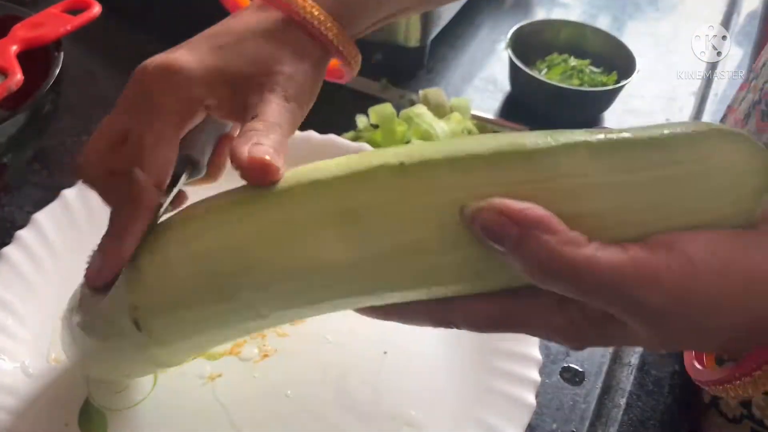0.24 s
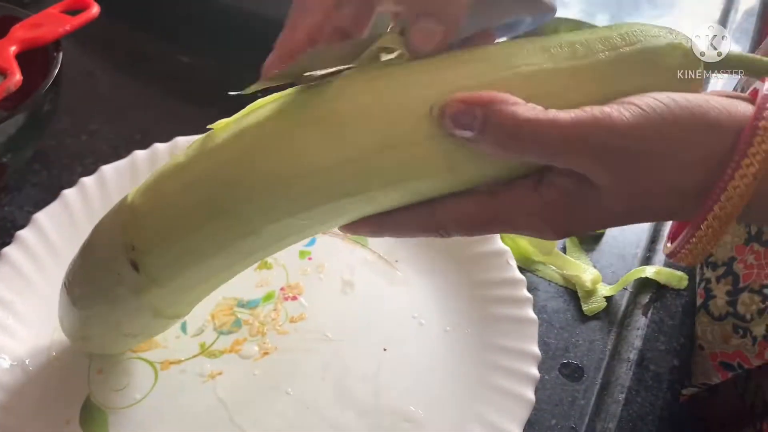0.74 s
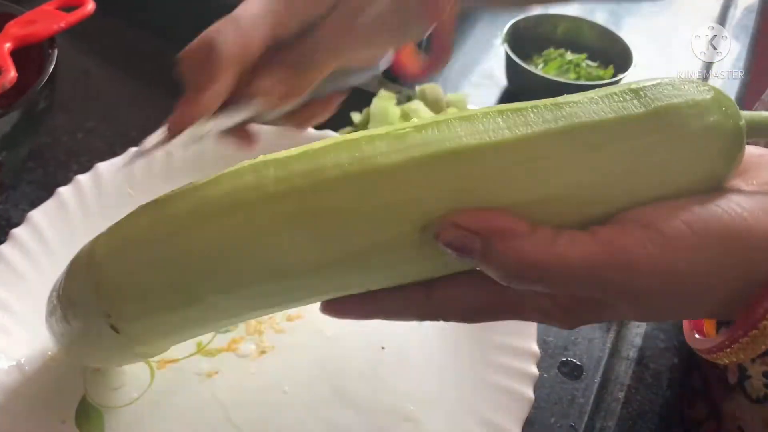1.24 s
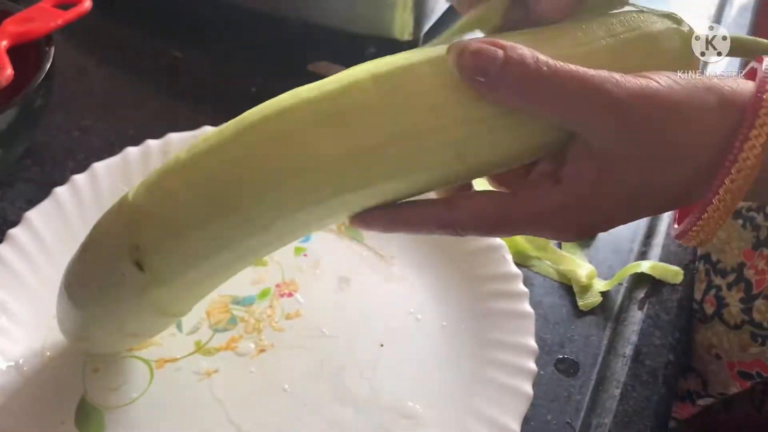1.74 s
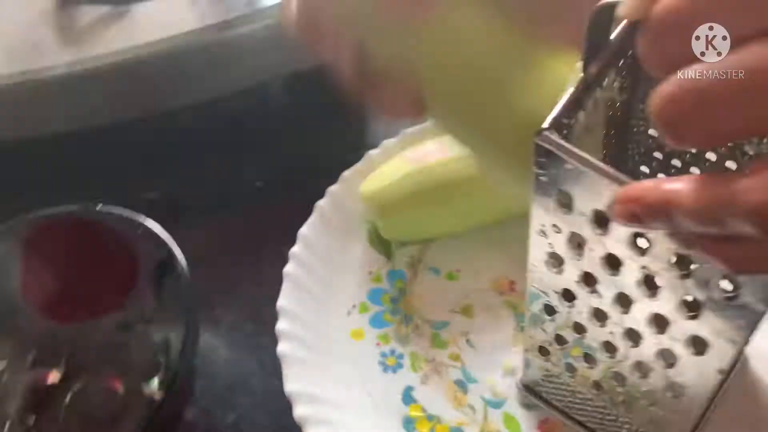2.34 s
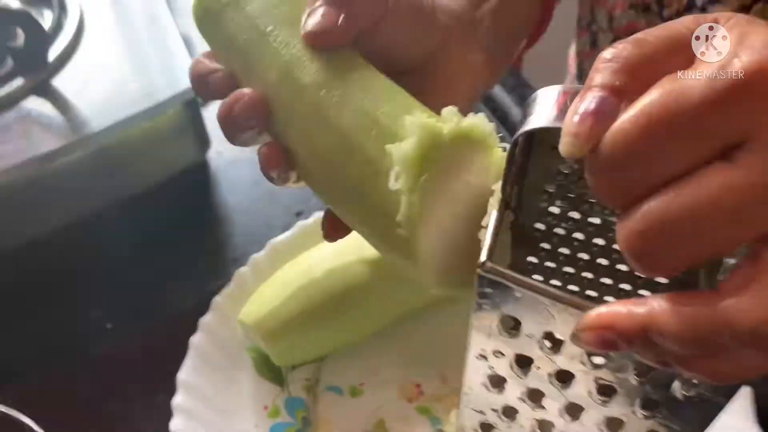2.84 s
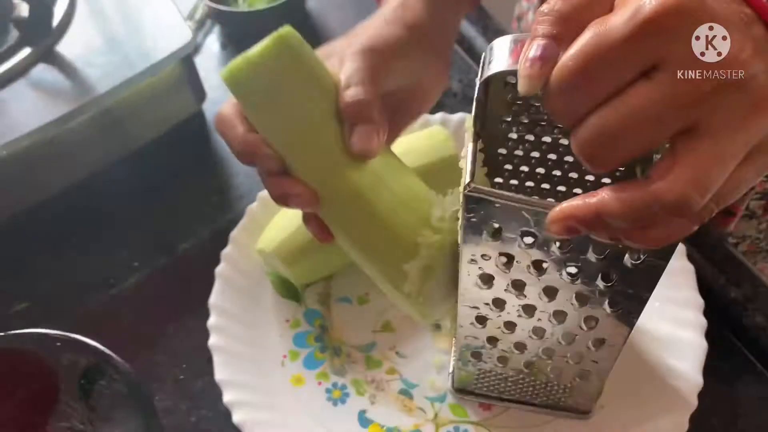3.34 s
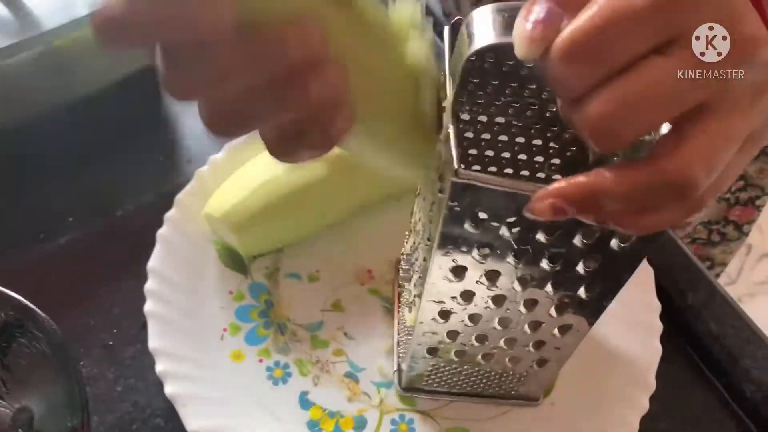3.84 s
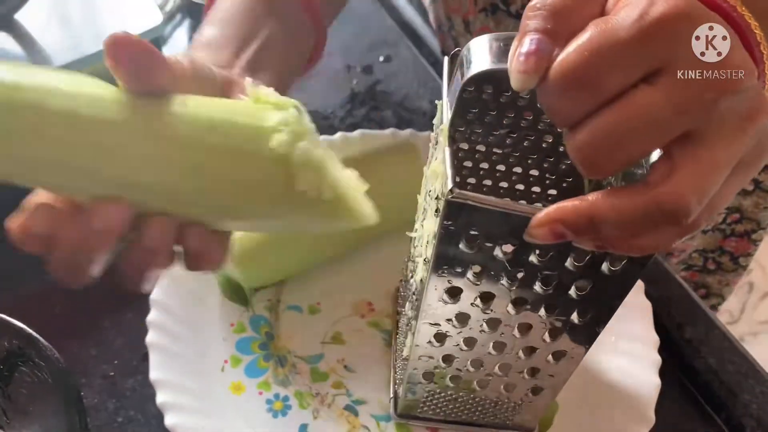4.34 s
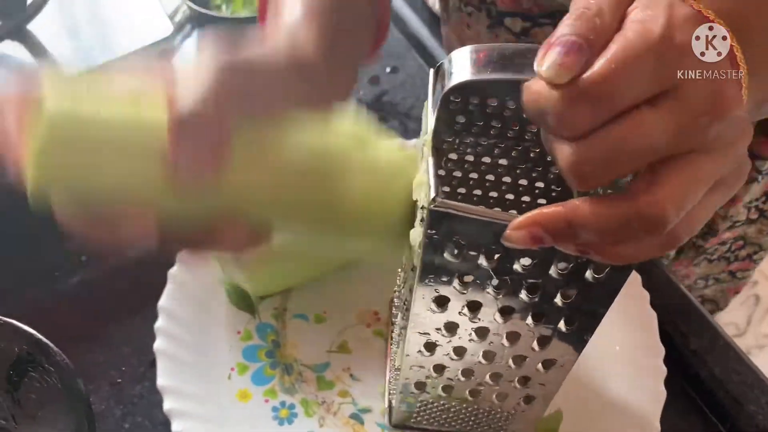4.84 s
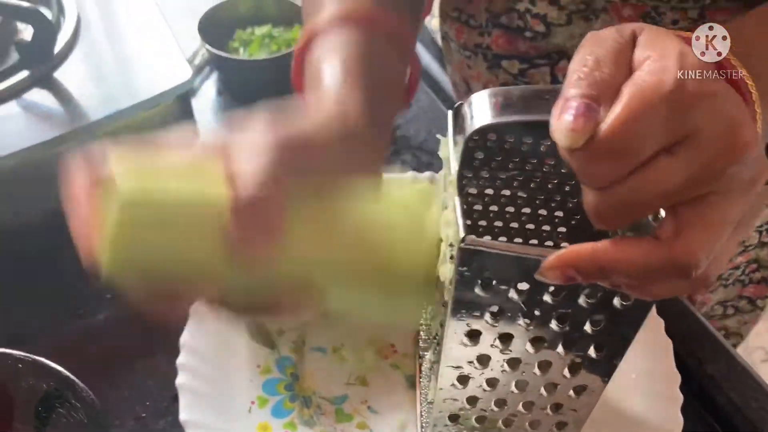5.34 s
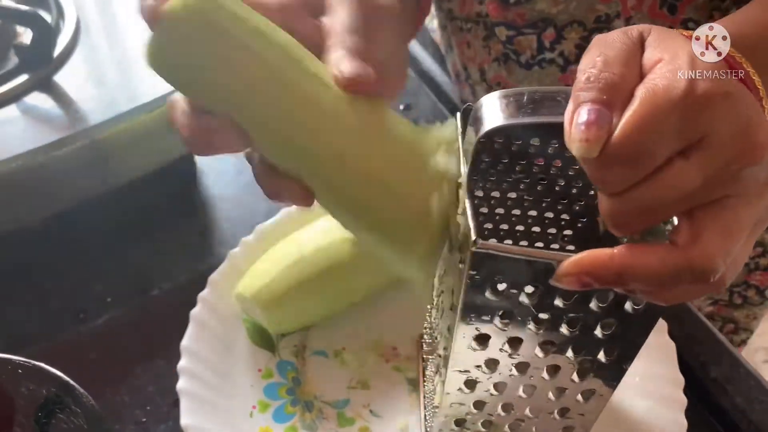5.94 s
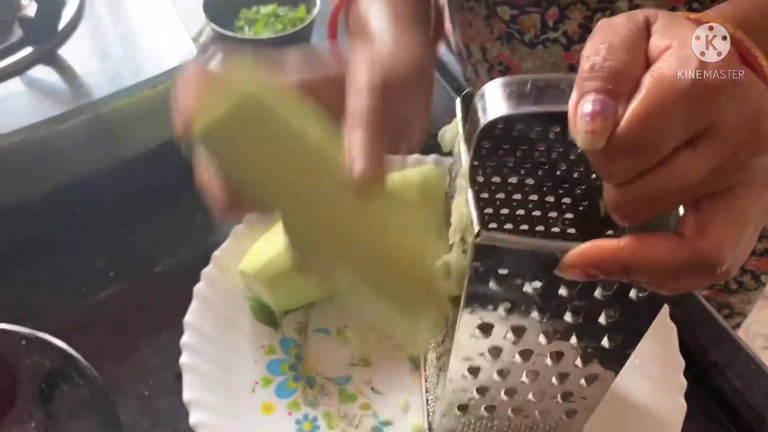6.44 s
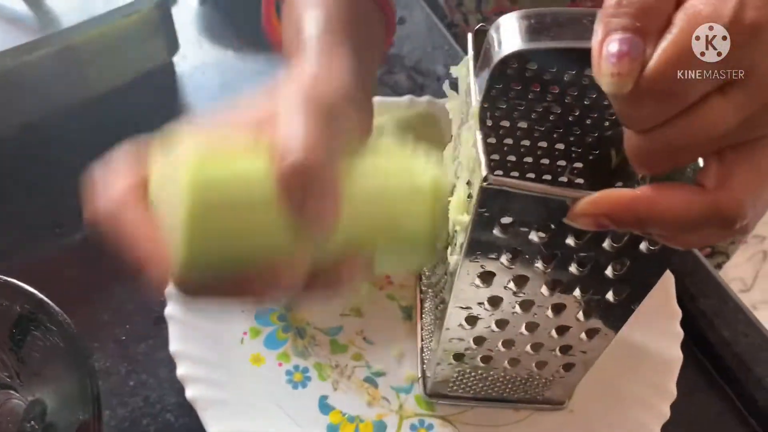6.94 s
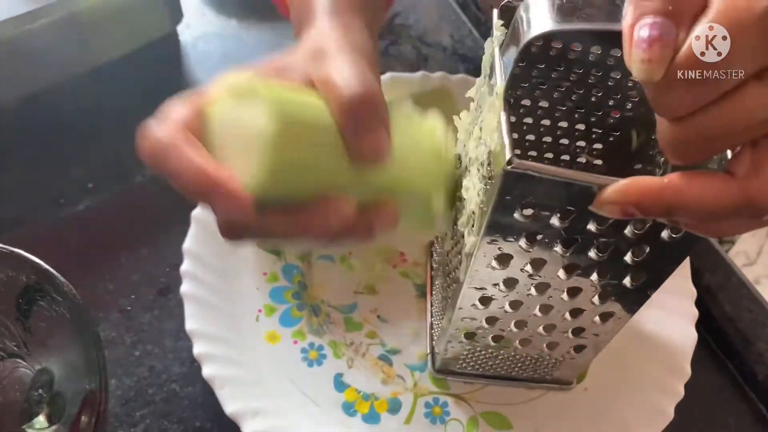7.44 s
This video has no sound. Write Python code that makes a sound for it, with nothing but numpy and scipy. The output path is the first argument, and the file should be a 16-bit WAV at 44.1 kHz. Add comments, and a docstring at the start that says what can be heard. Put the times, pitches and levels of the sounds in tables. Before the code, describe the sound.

In a small kitchen with a faint motor hum, a peeler snaps and tears through a hollow-sounding gourd in short pulls, with thin distant chirps between. Then a steel box grater rasps in five quick, even runs, wet and crunchy; its foot judders and groans twice on a plate with hard clunks. The grating stops and a vessel knocks on the counter. Close stereo microphone.

```python
"""A motor hums in dull room noise (sines, coloured noise); a bottle gourd is peeled (grains, hollow body).
Faint chirps (gliding sines) follow. Then five fast, even runs on a steel box grater: each stroke sends
grains through flesh, face and box spectra. Twice the foot judders and groans on a plate (stick-slip
pulses, a sine), with clunks; the box knocks and hiss comes and goes. All this dips near 1.9 s and from
7.5 s to the end, where a vessel is knocked on the counter (noise, decaying modes)."""
import sys
import numpy as np
from scipy import signal
from scipy.fft import rfft, irfft, next_fast_len
from scipy.io import wavfile
from scipy.ndimage import uniform_filter1d

SR = 44100
rng = np.random.default_rng(int(sys.argv[2]) if len(sys.argv) > 2 else 0)


def store_pcm(level_fs):
    """Save levels as 16-bit WAV."""
    pcm = np.round(np.clip(level_fs, -1, 1) * 32767).astype(np.int16)
    wavfile.write(sys.argv[1], SR, np.atleast_2d(pcm).T)


N = 339570
TIME = np.arange(N) / SR


def from_db(db):
    """Amplitude ratio of a level in dB."""
    return 10 ** (np.asarray(db) / 20)


def rms_one(x):
    """Scale to rms 1."""
    return x / np.sqrt(np.mean(x ** 2) + 1e-20)


def unit_energy(response):
    """Scale an impulse response so that it keeps the power of white noise."""
    return rms_one(response) / np.sqrt(response.shape[-1])


def at_hz(points, hz):
    """Read a spectrum on a log-frequency axis."""
    known_hz, value = np.transpose(points)
    return np.interp(np.log(hz + 1), np.log(known_hz), value)


def drift(rate_hz):
    """Slow random curve of rms 1, with rate_hz random knots per second."""
    knots = np.arange(0, TIME[-1] + 1, 1 / rate_hz)
    return rms_one(np.interp(TIME, knots, rng.standard_normal(len(knots))))


def clicks(rows):
    """One impulse for each (t/s, level/dB)."""
    out = np.zeros(N)
    for s, db in rows:
        out[int(s * SR)] += from_db(db)
    return out


def held(start, end, rise_db_per_s, fall_db_per_s):
    """Gain that rises to one at the start, holds, and dies away after the end."""
    rise_db = -rise_db_per_s * np.maximum(start - TIME, 0)
    fall_db = -fall_db_per_s * np.maximum(TIME - end, 0)
    return from_db(rise_db + fall_db) + 1e-12


def held_spans(spans, rise_db_per_s, fall_db_per_s):
    """Summed held gains of (start/s, end/s, level/dB)."""
    return sum(from_db(db) * held(start, end, rise_db_per_s, fall_db_per_s) for start, end, db in spans)


def through(x, response):
    """Send a sound through an impulse response."""
    return signal.fftconvolve(np.atleast_2d(x), np.atleast_2d(response), axes=1)[:, :N]


def colour(spectrum, size=4096):
    """Causal (minimum-phase) response with the given spectrum, falling away beyond its ends."""
    hz = np.arange(size // 2 + 1) * SR / size + 1
    low_end = 1 / (1 + (spectrum[0][0] / hz) ** 4)
    high_end = 1 / (1 + (hz / spectrum[-1][0] / 2) ** 4)
    cepstrum = irfft(np.log(from_db(at_hz(spectrum, hz)) * low_end * high_end + 1e-5))
    # fold the cepstrum forward: minimum phase
    cepstrum[1:size // 2] *= 2
    cepstrum[size // 2 + 1:] = 0
    return unit_energy(irfft(np.exp(rfft(cepstrum))))


def resonances(modes, size=8192):
    """Response of parallel (f/Hz, width/Hz, level/dB) resonances with alternating sign."""
    t = TIME[:size]
    response = 0
    for k, (hz, width_hz, db) in enumerate(modes):
        decay = width_hz * np.exp(-np.pi * width_hz * t)
        response = response + (-1) ** k * from_db(db) * decay * np.cos(2 * np.pi * hz * t)
    return unit_energy(response)


# Likeness of the two microphones: f/Hz, correlation
MIC_LIKENESS = [(100, 0.076), (400, 0.89), (700, 0.84), (1400, 0.73), (2600, -0.35), (5000, -0.15),
                (15000, -0.16)]


def two_ports(pair):
    """Mix two unrelated signals onto two microphones: alike in low mids, slightly opposed in treble."""
    size = next_fast_len(pair.shape[1])
    mid, side = rfft(pair, size)
    alike = np.clip(at_hz(MIC_LIKENESS, np.arange(len(mid)) * SR / size), -.97, .97)
    spectra = np.sqrt(1 + alike) * mid + np.sqrt(1 - alike) * side * [[1], [-1]]
    return irfft(spectra, size)[:, :pair.shape[1]]


def stereo_noise(size):
    """White noise on the two microphones."""
    return two_ports(rng.standard_normal((2, size)))


def grains(per_s, spread_db):
    """Single-sample grains at random moments and places, a few much louder; stereo."""
    sizes = from_db(spread_db * np.minimum(rng.exponential(1, N), 4))
    sizes = sizes * (rng.random(N) < per_s / SR)
    place = rng.uniform(0, 2 * np.pi, N)
    return two_ports(rms_one(sizes * np.array([np.cos(place), np.sin(place)])))


def space(near_db, room_db, near_t60=0.049, room_t60=0.25, size=16384):
    """Direct sound, quick reflections from steel and counter, and the kitchen's tail; t60 in s."""
    t = TIME[:size]
    near = unit_energy(stereo_noise(size) * from_db(-60 * t / near_t60))
    tail = unit_energy(stereo_noise(size) * from_db(-60 * t / room_t60) * (t > .006))
    return unit_energy((t == 0) + from_db(near_db) * near + from_db(room_db) * tail)


def off_centre(x, lag_s=.00016):
    """One sound on both microphones, a little later on the right."""
    return np.array([x, np.interp(TIME - lag_s, TIME, x)])


def running_level(x, size):
    """Short-term rms of a stereo sound over size samples."""
    return np.sqrt(np.abs(uniform_filter1d(np.mean(x ** 2, axis=0), size=size)) + 1e-9)


# Room noise spectrum: f/Hz, level/dB
AIR_SPECTRUM = [(50, -28.5), (95, -18.5), (140, -4.5), (200, -1), (270, -6), (440, 0), (640, -9.5),
                (840, -5), (930, -10.5), (1100, -8), (1200, -5.5), (1400, -9.5), (2100, -11), (2800, -15.5),
                (7000, -23.5), (15000, -35)]
# Motor harmonics: f/Hz, level/dB
MOTOR_HUM = [(199.9, -64.5), (299.9, -79.5), (399.8, -74), (499.7, -76)]
PEELING_AIR_DB, GRATING_AIR_DB = -63, -61  # before and after the first dip starts


def background():
    """Dull room noise of coloured noise, and a motor's hum of sines with drifting phase."""
    air = through(stereo_noise(N), colour(AIR_SPECTRUM)) * from_db(0.94 * drift(11))
    hum = 0
    for hz, db in MOTOR_HUM:
        hum = hum + np.sqrt(2) * from_db(db) * np.sin(2 * np.pi * hz * TIME + 0.2 * drift(7.9))
    air_db = np.where(TIME < DIP_SPANS[0][0], PEELING_AIR_DB, GRATING_AIR_DB)
    return air * from_db(air_db) + hum


# Hands shifting on the gourd: start/s, end/s, level/dB
HAND_SHIFTS = [(0.03, 0.054, -64), (0.158, 0.29, -65), (0.506, 0.554, -60.5), (0.795, 0.865, -65.5)]
# Resonances of the handled gourd: f/Hz, width/Hz, level/dB
HAND_MODES = [(450, 58, -4), (837, 47, 3.5), (1024, 65, -0.5), (1224, 70, -3)]
SHIFT_FADE_DB_PER_S = 200


def handling():
    """Soft, hollow rubbing as the hands move: sparse grains through a few resonances."""
    level = held_spans(HAND_SHIFTS, SHIFT_FADE_DB_PER_S, SHIFT_FADE_DB_PER_S)
    return through(grains(per_s=900, spread_db=3.0) * level, resonances(HAND_MODES))


PEEL_RISE_DB_PER_S, PEEL_FALL_DB_PER_S = 1000, 296
# Strip ringing higher as the blade runs along: start/s, end/s, first f/Hz, last f/Hz, level/dB
STRIP_GLIDES = [(0.368, 0.425, 715, 1400, -52.5), (1.486, 1.524, 1100, 1470, -52.5)]
STRIP_WIDTH_HZ = 170


def strips(cells):
    """Tearing cells excite a resonance that glides upward during two of the pulls."""
    out, pole = 0, np.exp(-np.pi * STRIP_WIDTH_HZ / SR)
    for start, end, first_hz, last_hz, db in STRIP_GLIDES:
        hz = np.interp(TIME, [start, end], [first_hz, last_hz])
        turn = np.exp(2j * np.pi * np.cumsum(hz) / SR)
        # one-pole filter in the frame turning with the glide
        ring = np.real(turn * signal.lfilter([1], [1, -pole], cells / turn))
        gain = from_db(db) * held(start, end, PEEL_RISE_DB_PER_S, PEEL_FALL_DB_PER_S)
        out = out + rms_one(ring) * gain
    return out


# Pulls through the skin: start/s, end/s, hollow gourd level/dB, blade hiss level/dB
PEEL_PULLS = [(0.247, 0.254, -57, -87), (0.307, 0.316, -54.5, -68), (0.361, 0.425, -56, -62.5),
              (1.42, 1.47, -58.5, -64), (1.5, 1.524, -61, -58.5)]
# Hollow gourd spectrum: f/Hz, level/dB
GOURD_SPECTRUM = [(450, 2), (720, 4), (1050, 6.5), (1350, 2), (1800, 1), (2500, -5.5), (4000, -8.5),
                  (6000, -18)]
# Tearing flesh spectrum, also for blade, scrape and crack: f/Hz, level/dB
TEAR_SPECTRUM = [(900, -6.5), (2000, -5.5), (3000, -2), (4500, -1), (7000, -1), (9000, -1), (12000, -2.5),
                 (15500, -2.5)]
# Blade catches: t/s, level/dB
BLADE_TICKS = [(0.0318, -47), (0.2498, -60), (0.3017, -48), (0.3541, -56), (0.9981, -47), (1.0899, -39)]
# Snapping skin fibres: t/s, level/dB
FIBRE_SNAPS = [(0.3025, -30), (0.306, -28), (0.3145, -35), (0.386, -32), (0.4, -36), (0.411, -33),
               (0.427, -33), (0.436, -27), (1.422, -36), (1.431, -26), (1.439, -38), (1.451, -31),
               (1.459, -37), (1.468, -29), (1.477, -29), (1.484, -31), (1.493, -28), (1.506, -30),
               (1.522, -29)]
# Blade rasps as the strip comes free: start/s, end/s, level/dB
BLADE_RASPS = [(0.304, 0.313, -66), (0.356, 0.37, -63), (1.511, 1.535, -55.5)]
# Blade's own ring: f/Hz, width/Hz, level/dB
BLADE_MODES = [(1400, 350, -5), (3920, 1450, 1)]
BLADE_FALL_DB_PER_S = 125  # hisses on as the strip comes free
TAP_S, TAP_DB = 1.091, -43  # the peeler is set down on the gourd


def peeling(ragged_db=1.5, tick_s=0.0045):
    """The blade catches with a crisp snap, then tears raggedly through skin; the gourd sounds hollow."""
    cells = grains(per_s=5000, spread_db=4.0) * from_db(ragged_db * drift(110))
    fibres = clicks(FIBRE_SNAPS)

    body_spans = [(start, end, db) for start, end, db, _ in PEEL_PULLS]
    body = held_spans(body_spans, PEEL_RISE_DB_PER_S, PEEL_FALL_DB_PER_S)
    hollow = through(cells * body + fibres, colour(GOURD_SPECTRUM))

    hiss_spans = [(start, end, db) for start, end, _, db in PEEL_PULLS]
    hiss = held_spans(hiss_spans, PEEL_RISE_DB_PER_S, BLADE_FALL_DB_PER_S)
    snaps = signal.lfilter([1], [1, -np.exp(-1 / (tick_s * SR))], clicks(BLADE_TICKS) + 1e-18)
    blade = through(cells * (hiss + snaps * from_db(-6.5)), colour(TEAR_SPECTRUM))

    rasp_level = held_spans(BLADE_RASPS, PEEL_RISE_DB_PER_S, PEEL_FALL_DB_PER_S)
    rasp = through(cells * rasp_level + from_db(-12) * fibres, resonances(BLADE_MODES))

    tap_response = resonances([(426, 39, -5), (564, 46, 3), (730, 29, 2), (1100, 420, -14)])
    tap = through(clicks([(TAP_S, TAP_DB)]), from_db(22.0) * tap_response)
    return through(hollow + strips(cells) + rasp + blade + tap, space(near_db=-2.0, room_db=-14.0))


# Faint chirps: start/s, length/s, first f/Hz, middle f/Hz, last f/Hz, level/dB
CHIRP_ARCHES = [(1.108, 0.037, 1910, 2030, 2080, -58), (1.161, 0.13, 1890, 2050, 1760, -55.5),
                (1.384, 0.028, 2010, 1980, 1930, -55)]


def chirps(flutter_db=2.0, waver=0.002):
    """Thin, wavering whistles from some way off: sines gliding along a parabola of pitch."""
    out, wobble = 0, 1 + waver * drift(150)
    flutter = from_db(flutter_db * drift(70))
    for start, length, *arch_hz, db in CHIRP_ARCHES:
        age = np.clip(TIME - start, 0, length)
        hz = np.polyval(np.polyfit([0, .5, 1], arch_hz, 2), age / length)
        fade = np.abs(np.sin(np.pi * age / length)) ** 0.68
        tone = np.sqrt(2) * np.sin(2 * np.pi * np.cumsum(hz * wobble) / SR)
        out = out + from_db(db) * fade * flutter * tone
    return through(out, space(near_db=-10, room_db=-7))


# Drops of everything but the knock, one brief, one lasting to the end: start/s, end/s
DIP_SPANS = [(1.886, 1.906), (7.508, 9)]
DIP_DB, DIP_FALL_S, DIP_RECOVER_S = -31.5, .008, 0.054


def dips():
    """Gain that falls away at each dip and recovers after its end."""
    gain_db = 0
    for start, end in DIP_SPANS:
        corners_s = [start - DIP_FALL_S, start, end, end + DIP_RECOVER_S]
        gain_db = gain_db + np.interp(TIME, corners_s, [0, DIP_DB, DIP_DB, 0])
    return from_db(gain_db)


# Runs of even strokes: first bite t/s, last bite t/s, rate/(1/s), tearing level/dB, box level/dB,
# softer start of the box/dB, box level on the return/dB, rubbing level/dB
STROKE_RUNS = [(2.003, 2.598, 15, -44, -42, 5, -42.5, -55.5),
               (2.981, 4.305, 15, -46.5, -47, -0.5, -52, -59.5),
               (4.823, 5.683, 13.8, -46, -45, 14.5, -47, -58.5),
               (5.865, 6.599, 13.6, -47, -44, 4.5, -46.5, -59),
               (6.761, 7.197, 13.7, -46, -43, 7, -47.5, -58.5)]
# Single catches, some between the runs, some accenting strokes: t/s, tearing level/dB, box level/dB
SINGLE_TOUCHES = [(1.937, -45.5, -51), (2.466, -49, -40.5), (2.912, -51.5, -54), (2.947, -64, -49),
                  (3.574, -51, -42.5), (4.269, -52, -53), (4.298, -52, -45.5), (4.745, -53, -56),
                  (4.796, -51, -48), (4.966, -42, -44), (5.469, -49, -47), (5.861, -60, -46),
                  (6.596, -48.5, -56), (6.983, -47.5, -55), (7.056, -46, -42.5), (7.348, -51.5, -50.5),
                  (7.457, -49, -45.5)]
PRESS_S, TEAR_FOLLOWS = 0.33, 0.47  # time to bear down; share of that swell in the tearing
BITE_HALF_S, BITE_SPREAD_DB, BITE_FACE_DB = 0.0092, 0.5, 0.97  # face dB relative to box
RETURN_HALF_S, RETURN_TEAR_DB, RETURN_SPREAD_DB = 0.0051, -10, 2.5
RETURN_FACE_DB = -3  # teeth pluck the face going down, mostly slide coming back
TOUCH_HALF_S = 0.0055


def strokes():
    """Bites (t/s, half length/s, tearing/dB, box/dB, face/dB): even, with a weak return between two."""
    rows = [(s, TOUCH_HALF_S, tear_db, box_db, box_db) for s, tear_db, box_db in SINGLE_TOUCHES]
    for first, last, per_s, tear_db, box_db, soft_db, return_db, _ in STROKE_RUNS:
        times, period = np.linspace(first, last, round((last - first) * per_s) + 1, retstep=True)
        luck = rng.standard_normal((len(times), 3))
        for s, (tear_luck, box_luck, return_luck) in zip(times, luck):
            press_db = -soft_db * max(1 - (s - first) / PRESS_S, 0)
            torn_db = tear_db + TEAR_FOLLOWS * press_db
            bite_db = torn_db + BITE_SPREAD_DB * tear_luck
            steel_db = box_db + press_db + BITE_SPREAD_DB * box_luck
            rows.append((s, BITE_HALF_S, bite_db, steel_db, steel_db + BITE_FACE_DB))
            if s < last:
                uneven_db = RETURN_SPREAD_DB * return_luck
                weak_db = torn_db + RETURN_TEAR_DB + uneven_db
                back_db = return_db + press_db / 2 + uneven_db
                rows.append((s + period / 2, RETURN_HALF_S, weak_db, back_db, back_db + RETURN_FACE_DB))
    return rows


def bites(rows, attack_share=0.91):
    """Power over time of the tearing, the box and the toothed face, swelling and falling at each bite."""
    power = np.zeros((3, N))
    for s, half_s, *db in rows:
        near = slice(int((s - .05) * SR), int((s + .05) * SR))
        age = (TIME[near] - s) / half_s
        age = np.where(age < 0, age / attack_share, age)
        power[:, near] += from_db(db)[:, None] ** 2 * np.exp(-np.abs(age) ** 2.8)
    return power


RUB_MARGIN_S = 0.015  # rubbing before and after each run
TOUCH_RUB_S, TOUCH_RUB_DB = 0.032, -65.5


def rubbing(flutter_db=4.5, rub_db=-2.5):
    """Fluttering power of the gourd sliding on the steel, during each run and around each touch."""
    spans = [(first - RUB_MARGIN_S, last + RUB_MARGIN_S, db) for first, last, *_, db in STROKE_RUNS]
    spans += [(s - TOUCH_RUB_S, s + TOUCH_RUB_S, TOUCH_RUB_DB) for s, _, _ in SINGLE_TOUCHES]
    power = sum(from_db(db) ** 2 * ((TIME > start) & (TIME < end)) for start, end, db in spans)
    return np.abs(uniform_filter1d(power, size=700)) * from_db(flutter_db * drift(98) + rub_db)


def touch(x, ring_s, size=2400):
    """Each new spot rings with other close modes: every short stretch gets its own noise response."""
    out = np.zeros((2, N + 3 * size))
    for i in range(0, N, size):
        response = unit_energy(stereo_noise(size) * from_db(-60 * TIME[:size] / ring_s))
        rung = signal.fftconvolve(x[:, i:i + size], response, axes=1)
        out[:, i:i + rung.shape[1]] += rung
    return out[:, :N]


# Plucked toothed face spectrum: f/Hz, level/dB
CLANG_SPECTRUM = [(800, -17), (1100, -5.5), (1400, 2.5), (1750, -4), (2100, -2.5), (2450, -17.5),
                  (2800, -15), (4000, -29)]
# Hollow box spectrum: f/Hz, level/dB
BOX_SPECTRUM = [(300, -9.5), (450, -3), (540, 1), (630, -5.5), (770, -1.5), (890, -5.5), (1000, -9.5),
                (1400, -26)]
# Shifting balance as the gourd moves: t/s, face level/dB, box level/dB
SPOT_BALANCE = [(2.0, -2.5, -4), (2.98, -3.5, -4.5), (3.12, -11, -4), (3.24, -2.5, -2.5), (3.31, 2.5, -6),
                (3.5, 1, 1.5), (3.75, -4.5, -5.5), (4.05, 2, -2.5), (4.3, -1.5, -1.5), (4.8, -4.5, -0.5),
                (5.1, -3.5, -3.5), (5.2, -1, -1.5), (6.0, -2.5, -2.5), (6.4, -2, -2.5), (7.2, -3.5, -3)]
TEETH_PER_S, TEETH_DB = 600, -10  # single teeth snap through the flesh during a bite


def grating(rub_box_db=5, rub_clang_db=-1):
    """Teeth crunch through flesh and shake the box; between bites the gourd rubs on the steel."""
    tear, box, face = bites(strokes())
    rub = rubbing()
    crackle = from_db(-3.5) * off_centre(grains(per_s=3500, spread_db=2.0)[0])
    mush = from_db(-3.0) * grains(per_s=9000, spread_db=4.5)
    teeth = from_db(TEETH_DB) * off_centre(grains(per_s=TEETH_PER_S, spread_db=2.0)[0])
    torn = (crackle + mush) * np.sqrt(tear + rub) + teeth * np.sqrt(tear)
    flesh = through(torn, colour(TEAR_SPECTRUM))

    spot_s, *spot_db = np.transpose(SPOT_BALANCE)
    face_db, box_db = (np.interp(TIME, spot_s, db) for db in spot_db)
    parts = ((CLANG_SPECTRUM, face, face_db, rub_clang_db), (BOX_SPECTRUM, box, box_db, rub_box_db))
    snags, steel = grains(per_s=1800, spread_db=3.0), 0
    # face and box answer the same snags, levelled so that strength follows the bites
    for spectrum, power, part_db, rub_db in parts:
        response = colour(spectrum)
        even = snags / running_level(through(snags, response), size=500)
        strength = np.sqrt(power + rub * from_db(rub_db) ** 2)
        steel = steel + from_db(part_db) * through(even * strength, response)

    crunch = flesh + from_db(-3.5) * touch(flesh, ring_s=0.0074)
    crunch += from_db(0.5) * steel + from_db(-4.0) * touch(steel, ring_s=0.048)
    return through(crunch, space(near_db=-13, room_db=-14.5, near_t60=0.015))


# Plate's main note, which the slipping foot locks onto and loads: t/s, f/Hz, level/dB
GROAN_CURVE = [(2.241, 490, -52), (2.275, 469.2, -41), (2.302, 492.3, -25), (2.335, 480, -25.5),
               (2.36, 450, -36), (2.402, 485.4, -24.5), (2.46, 478, -45), (2.592, 478.3, -70),
               (2.616, 477, -26.5), (2.65, 472.5, -31.5), (2.685, 478, -24), (2.725, 475, -40),
               (2.81, 471, -60)]


def groan(waver=.018, rough_db=1.8):
    """The plate sings on one wavering note around the judders: a sine of drifting pitch and level."""
    s, hz, db = np.transpose(GROAN_CURVE)
    turns = np.cumsum(np.interp(TIME, s, hz) * (1 + waver * drift(110))) / SR
    level = from_db(np.interp(TIME, s, db) + rough_db * drift(130))
    level = level * (TIME > s[0]) * (TIME < s[-1])
    return off_centre(np.sqrt(2) * level * np.sin(2 * np.pi * turns), lag_s=0.0002)


def swaying(x, share=0.0119):
    """The pitch of a ringing sound sways with the changing load: its time axis is bent at random."""
    bent = TIME + np.cumsum(share * drift(45)) / SR
    return np.array([np.interp(bent, TIME, channel) for channel in x])


# Foot juddering over the plate: start/s, end/s, level/dB
JUDDER_SPANS = [(2.286, 2.395, -25.5), (2.614, 2.707, -24.5)]
JUDDER_RISE_DB_PER_S = 946


def juddering(fall_db_per_s):
    """Strength of the judder over time."""
    return held_spans(JUDDER_SPANS, JUDDER_RISE_DB_PER_S, fall_db_per_s)


# Plate modes: f/Hz, width/Hz, level/dB
PLATE_MODES = [(320, 42.5, -4), (387, 67, -7.5), (440, 38, 1), (490, 39.6, 2.5), (538, 35, -3.5),
               (668, 31, -2), (749, 28, -1.5), (874, 35, -7)]
# Rattling box modes: f/Hz, width/Hz, level/dB
RATTLE_MODES = [(1055, 195, 0), (1234, 70, 0.5), (1390, 110, -1.5), (1776, 274, -1.5), (2150, 260, -2),
                (2920, 480, -8.5), (3420, 280, -6.5), (4060, 1010, -10)]
# Modes of the counter under the plate: f/Hz, width/Hz, level/dB
COUNTER_MODES = [(262, 26, -3.5), (349, 74, 2)]
# Toothed face modes: f/Hz, width/Hz, level/dB
FACE_MODES = [(1600, 49, 2), (1720, 96, -3.5), (1801, 50, 2)]
# Share of the face in each judder: level/dB
FACE_SHARES = [-17.5, -11]
PLATE_FALL_DB_PER_S, RATTLE_FALL_DB_PER_S = 301, 441
RATTLE_DB, COUNTER_DB = -6.5, -14.5


def judder(slip_hz=165, jitter=.13, rough=0.57, lurch_db=1.04):
    """The foot sticks and slips unevenly; slips ring plate and face, rattle the box, thump the counter."""
    turns = np.cumsum(slip_hz * (1 + jitter * drift(120))) / SR
    pulses = np.diff(np.floor(turns), prepend=0) * from_db(2.6 * drift(200))
    slips = rms_one(pulses) + rough * grains(per_s=4000, spread_db=2.0)
    parts = ((PLATE_MODES, 0, PLATE_FALL_DB_PER_S),
             (RATTLE_MODES, RATTLE_DB, RATTLE_FALL_DB_PER_S),
             (COUNTER_MODES, COUNTER_DB, RATTLE_FALL_DB_PER_S))
    out = 0
    for modes, part_db, fall in parts:
        ringing = through(through(slips, resonances(modes)), space(near_db=-1.0, room_db=-1.0))
        if modes is PLATE_MODES:
            ringing = swaying(ringing)
        steady = ringing / running_level(ringing, size=800)
        out = out + steady * from_db(part_db) * juddering(fall)

    scraping = grains(per_s=20000, spread_db=-0.5) * juddering(RATTLE_FALL_DB_PER_S)
    scrape = through(scraping, colour(TEAR_SPECTRUM))
    face_spans = [(start, end, db + share_db)
                  for (start, end, db), share_db in zip(JUDDER_SPANS, FACE_SHARES)]
    face = held_spans(face_spans, JUDDER_RISE_DB_PER_S, RATTLE_FALL_DB_PER_S)
    out = out + face * rms_one(swaying(through(slips, resonances(FACE_MODES)), share=.02))
    return (out + from_db(-24.5) * scrape) * from_db(lurch_db * drift(90))


# Grater dropping back on the plate: t/s, level/dB
RIM_CLUNKS = [(2.292, -17.5), (2.361, -12.5), (2.655, -13), (2.668, -6), (2.691, -5.5), (2.76, -19)]


def clunks():
    """The grater's rim lands on the plate: the judder's modes, a thump of the counter and a crack."""
    blow = resonances(PLATE_MODES) * from_db(13.5)
    blow = blow + (resonances(RATTLE_MODES) + resonances(FACE_MODES)) * from_db(6.5)
    blow = blow + resonances(COUNTER_MODES) * from_db(8.0)
    hits = clicks(RIM_CLUNKS)
    ring = through(blow, space(near_db=-2.0, room_db=-7.5, near_t60=0.04))
    crack_space = space(near_db=9.5, room_db=2.0, near_t60=0.06)
    crack = from_db(-0.5) * through(colour(TEAR_SPECTRUM), crack_space)
    return through(hits, ring) + through(hits, crack)


# Box rocking and knocking on varied notes: t/s, level/dB, f/Hz
BOX_ROCKS = [(3.574, -37, 567), (4.102, -48, 770), (4.792, -40, 730), (4.929, -37.5, 768),
             (5.069, -42, 874), (5.258, -39, 556), (5.268, -36, 857), (5.431, -37.5, 757),
             (5.505, -37, 537), (5.508, -32.5, 877), (5.644, -33.5, 834), (5.86, -42, 552),
             (6.456, -38, 755), (6.596, -40, 546), (7.055, -42, 765), (7.127, -39, 567), (7.194, -42, 558)]
ROCK_T60_S, ROCK_RISE_S = 0.067, 0.0024  # ring, contact time
ROCK_OVERTONE_RATIO, ROCK_OVERTONE_DB = 1.58, -10.5


def rocks():
    """Short hollow knocks of the box: two decaying modes each."""
    out, t = np.zeros(N), TIME[:8192]
    fade_db = -60 * t / ROCK_T60_S
    contact = 1 - np.exp(-t / ROCK_RISE_S)
    for s, db, hz in BOX_ROCKS:
        overtone = np.sin(2 * np.pi * hz * ROCK_OVERTONE_RATIO * t)
        ring = np.sin(2 * np.pi * hz * t) + from_db(ROCK_OVERTONE_DB) * overtone
        out[int(s * SR):][:len(t)] += ring * from_db(db + fade_db) * contact
    return through(off_centre(out), space(near_db=-14, room_db=-12))


# Hiss coming and going: start/s, end/s, lower band level/dB, upper band level/dB
HISS_SPANS = [(4.436, 4.558, -69.5, -62.5), (6.82, 7.09, -61.5, -68), (7.354, 7.425, -73, -65)]
# Lower and upper band, each a list of: f/Hz, width/Hz, level/dB
HISS_MODES = [
    [(4400, 570, 0)],
    [(8800, 690, 7.5), (9240, 360, 0.5)],
]
HISS_FADE_DB_PER_S = 173


def high_hiss():
    """A faint hiss: noise in two narrow bands about an octave apart."""
    out = 0
    for k, band in enumerate(HISS_MODES):
        spans = [(start, end, db[k]) for start, end, *db in HISS_SPANS]
        level = held_spans(spans, HISS_FADE_DB_PER_S, HISS_FADE_DB_PER_S)
        out = out + through(stereo_noise(N) * level, resonances(band))
    return out


# Vessel modes: f/Hz, level/dB, t60/s
VESSEL_MODES = [(324, 1, 0.32), (528, -1.5, 0.4), (883, -4, 0.1), (1180, -17, 0.3), (1423, 5.5, 0.055),
                (1700, -8, 0.04), (2050, -13, 0.23), (2330, -13, 0.12), (2850, -17, 0.14),
                (3300, -32, 0.063), (3820, -22, 0.066), (4130, -21, 0.077)]
# Dull spectrum of the crash and the faint noise before it: f/Hz, level/dB
THUD_SPECTRUM = [(100, -10.5), (160, -5), (350, -5), (520, -8.5), (680, -11), (900, -2), (1400, -6.5),
                 (2000, -19), (4000, -29.5), (7500, -44)]
# Note swelling just before the knock: f/Hz, width/Hz, level/dB
LEAD_IN_NOTE_MODES = [(498, 4.9, 0)]
KNOCK_S, KNOCK_DB, THUD_TOP_HZ = 7.6597, -22, 7900
LEAD_IN_S, LEAD_IN_DB, LEAD_IN_FADE_DB_PER_S, LEAD_IN_NOTE_DB = 7.595, -59, 413, 9


def knock(thud_db=-21.0, thud_t60=0.19, crack_db=-21, crack_t60=0.038, rise_s=0.001):
    """A faint noise and a note near 500 Hz swell, then a vessel hits: crack, dull crash, ringing modes."""
    age = np.maximum(TIME - KNOCK_S, 0)
    contact = 1 - np.exp(-age / rise_s)
    ring = 0
    for k, (hz, db, t60) in enumerate(VESSEL_MODES):
        ring = ring + (-1) ** k * from_db(db - 60 * age / t60) * np.sin(2 * np.pi * hz * age)

    lead_in_span = [(LEAD_IN_S, KNOCK_S, LEAD_IN_DB)]
    lead_in = stereo_noise(N) * held_spans(lead_in_span, LEAD_IN_FADE_DB_PER_S, LEAD_IN_FADE_DB_PER_S)
    lead_in_note = from_db(LEAD_IN_NOTE_DB) * through(lead_in, resonances(LEAD_IN_NOTE_MODES))

    impact = stereo_noise(N) * contact
    crash = impact * from_db(thud_db - 60 * age / thud_t60)
    cracking = impact * from_db(crack_db - 60 * age / crack_t60)
    crack = through(cracking, resonances([(1140, 310, -0.5), (2370, 500, -9.5)]))
    lowpass = signal.butter(6, THUD_TOP_HZ, fs=SR, output="sos")
    dull = signal.sosfilt(lowpass, through(crash + lead_in, colour(THUD_SPECTRUM)))
    return from_db(KNOCK_DB) * ring * contact + dull + crack + lead_in_note


def scene():
    """Sum all layers, the grater slightly to the left; the knock stays outside the dips."""
    grater = grating() + rocks() + judder() + groan() + clunks()
    grater = grater * from_db([[.7], [-.7]])
    dipped = grater + peeling() + handling() + chirps() + high_hiss() + background()
    return dipped * dips() + knock()


CUTOFF_HZ = 15900


def record(dry):
    """The microphone drops the deep bass; the top is cut steeply."""
    highpass = signal.butter(2, 110, "high", fs=SR, output="sos")
    lowpass = signal.ellip(10, .1, 80, CUTOFF_HZ, fs=SR, output="sos")
    return signal.sosfilt(lowpass, signal.sosfilt(highpass, dry))


dry = scene()
out = record(dry)
store_pcm(out)
```